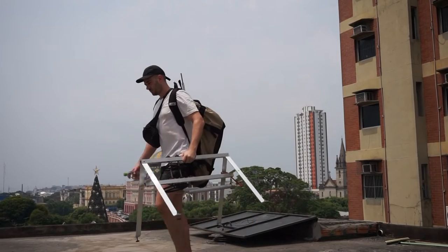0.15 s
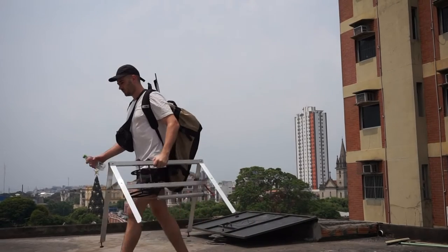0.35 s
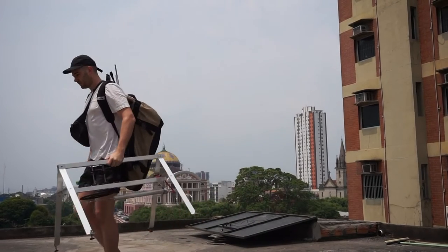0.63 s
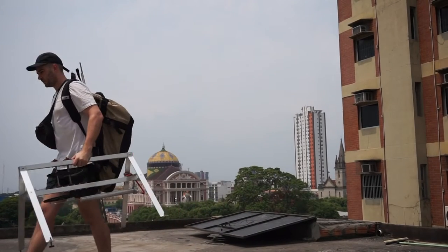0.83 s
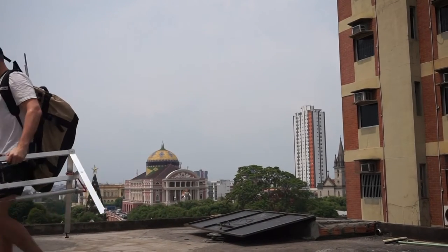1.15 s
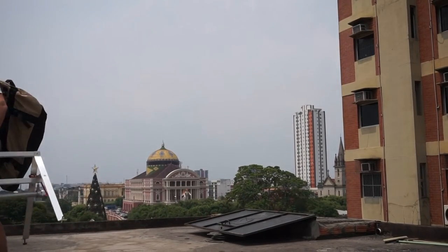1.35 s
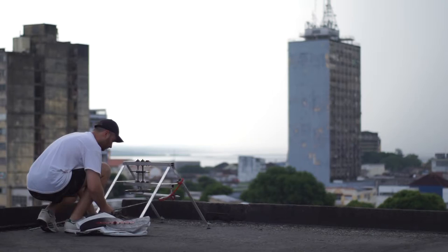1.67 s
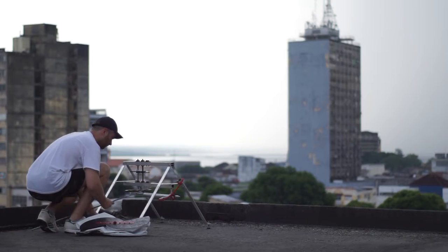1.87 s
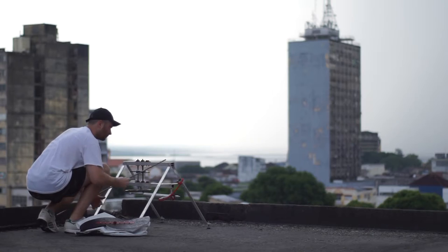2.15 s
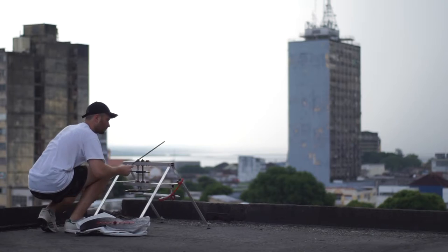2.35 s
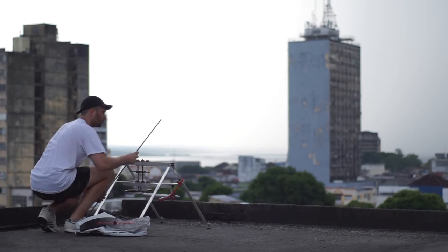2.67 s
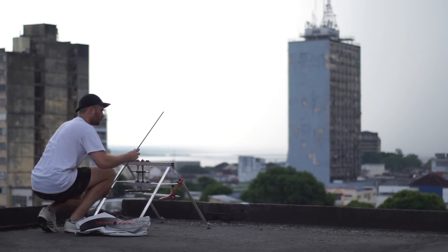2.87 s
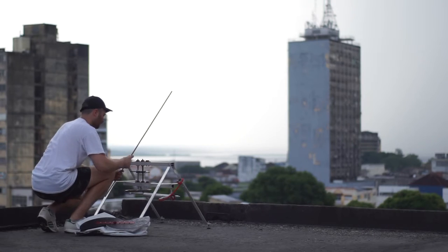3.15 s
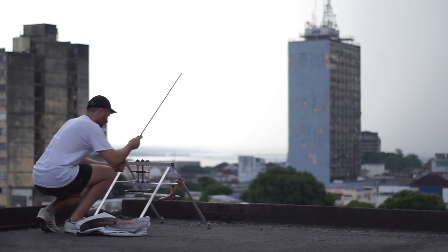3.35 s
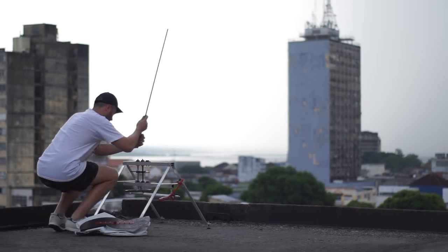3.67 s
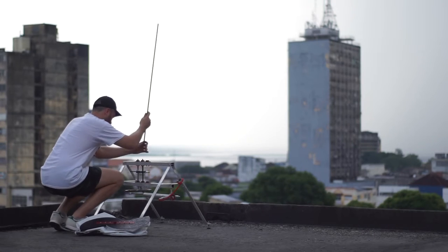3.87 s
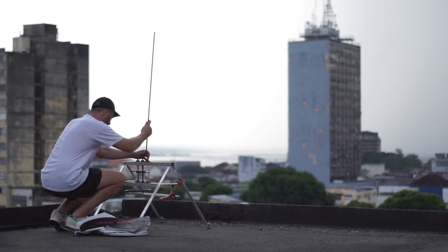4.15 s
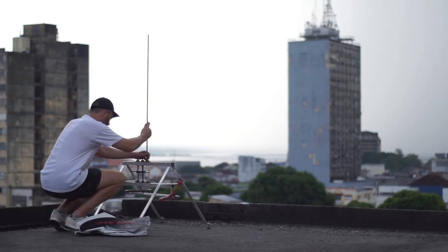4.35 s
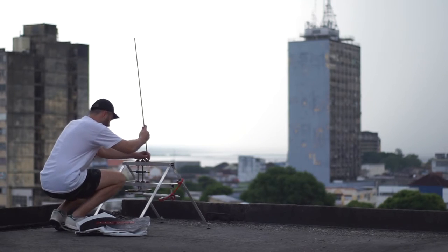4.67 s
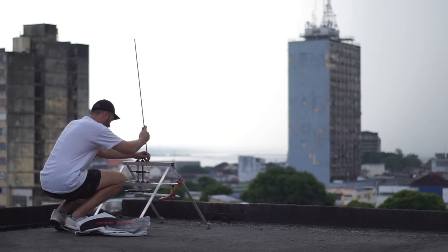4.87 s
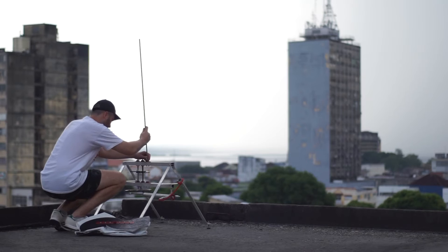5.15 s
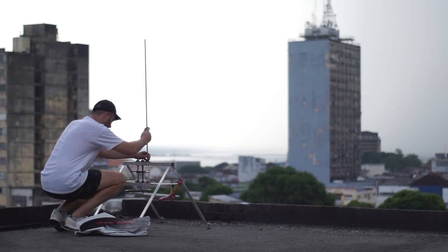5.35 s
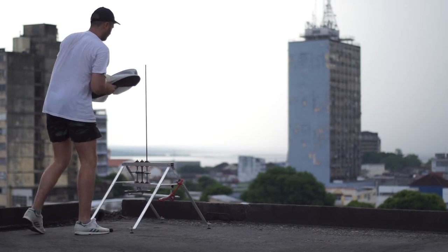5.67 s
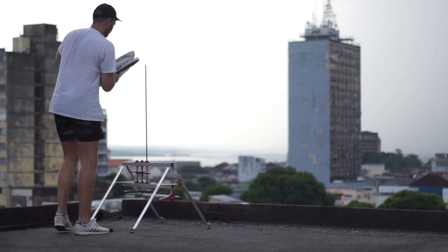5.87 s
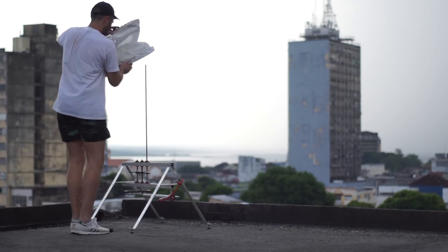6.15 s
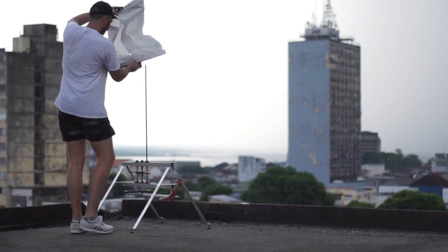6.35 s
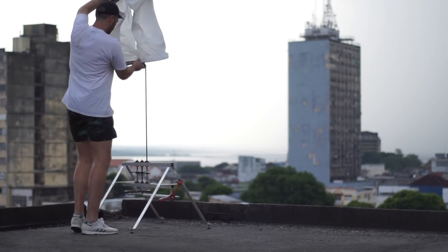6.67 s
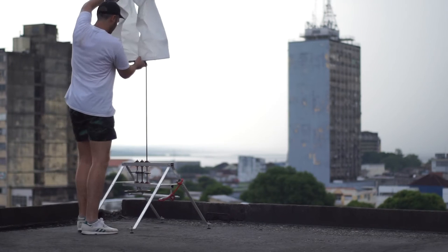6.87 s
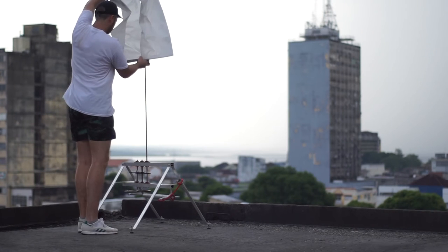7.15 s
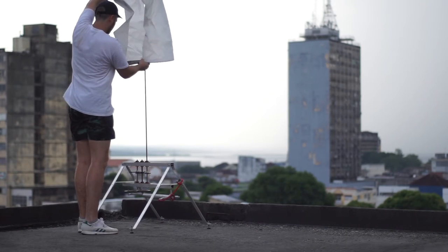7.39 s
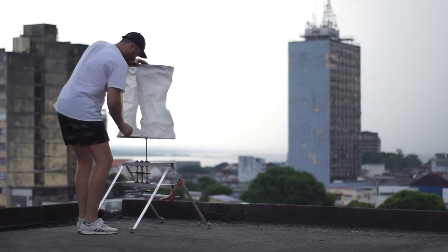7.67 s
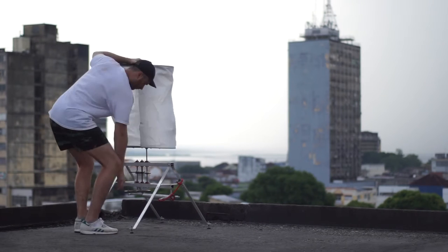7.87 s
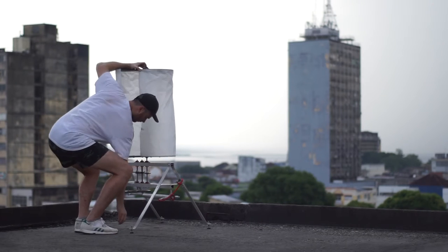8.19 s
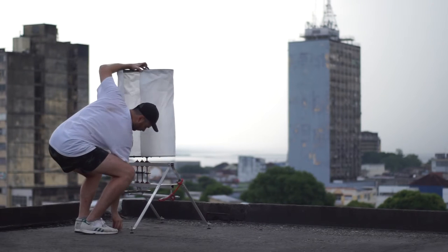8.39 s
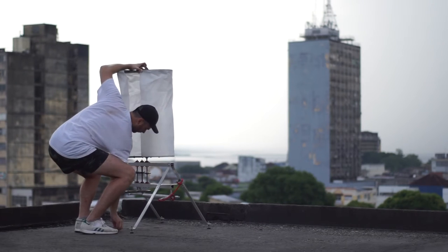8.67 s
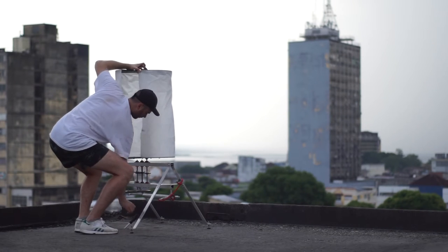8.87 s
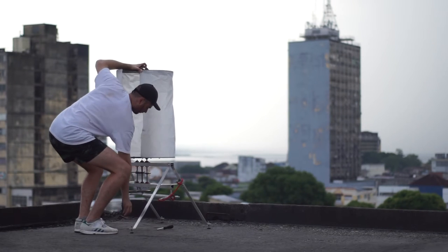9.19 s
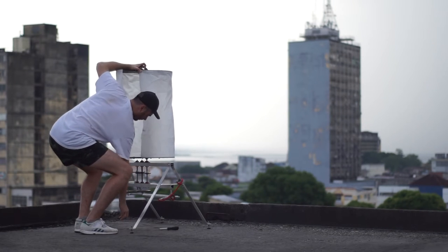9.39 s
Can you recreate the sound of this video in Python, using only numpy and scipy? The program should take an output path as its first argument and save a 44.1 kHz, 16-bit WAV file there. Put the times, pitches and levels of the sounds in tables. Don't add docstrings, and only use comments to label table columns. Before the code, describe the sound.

Two spaced microphones over an open roof catch bassy city traffic, calm at first and busiest at the end. Engines drone up and down, with a faint far horn near two seconds. Close, sparse handling sounds interrupt: dry shoe taps and hollow tube knocks, then a click with a tiny rod squeak, then two short bright jingles of metal parts with rustling cloth.

```python
import sys
import numpy as np
from scipy import signal
from scipy.io import wavfile

SR = 44100
rng = np.random.default_rng(int(sys.argv[2]) if len(sys.argv) > 2 else 0)


def amplitude_ratio(level_db):
    exponent = np.asarray(level_db, float) / 20
    return 10 ** exponent


def digitize_waveform(pressure):
    field = np.atleast_2d(pressure).T
    bounded = np.clip(field, -1, 1)
    quanta = np.round(bounded * 32767).astype(np.int16)
    wavfile.write(sys.argv[1], SR, quanta)


N = 420273
SPACING_S = 35 / SR


def rms_one(x):
    return x / np.sqrt(np.mean(x ** 2) + 1e-20)


def in_time(rows):
    s, *columns = np.transpose(rows)
    return [np.interp(np.arange(N) / SR, s, c) for c in columns]


def at_hz(points, hz):
    table_hz, value = np.transpose(points)
    return np.interp(np.log(hz), np.log(table_hz), value)


def drift(rate):
    r = np.exp(-80 * np.pi * rate / SR)
    slow = signal.lfilter([1], [1, -2 * r, r * r], rng.standard_normal(N // 40 + 2002))[2000:]
    return rms_one(slow - slow.mean())


def spread(slow):
    return np.interp(np.arange(N) / 40, np.arange(len(slow)), slow)


def bumps(rows):
    t = np.arange(N // 40 + 2) * 40 / SR
    return spread(sum(db * np.exp(-((t - s) / half_s) ** 2) for s, half_s, db in rows))


def band_pass(x, low_hz, high_hz):
    return signal.sosfilt(signal.butter(2, [low_hz, high_hz], "band", fs=SR, output="sos"), x)


def ring(clicks, hz, t60):
    r, w = amplitude_ratio(-60 / (t60 * SR)), 2 * np.pi * hz / SR
    return signal.lfilter([0, np.sin(w)], [1, -2 * r * np.cos(w), r * r], clicks + 1e-18)


def lean(left_db):
    return amplitude_ratio(np.array([[left_db], [-left_db]]))


def heard(x, lag_s, pan_db):
    n, half = np.arange(N), lag_s * SR / 2
    return np.array([np.interp(n - half, n, x), np.interp(n + half, n, x)]) * lean(pan_db / 2)


# (frequency [Hz], share [0-1])
STRAIGHT_SHARE = [(25, 0.93), (60, 0.94), (130, 0.79), (300, 0.69), (640, 0.32), (1300, 0.25), (3000, 0),
                  (8000, 0.17)]


def street_noise(spectrum, right_share, patchy_db, scatter=1.0):
    lag, pad, out = round(SPACING_S * SR), SR // 2, 0
    draws = rng.standard_normal((2, 4, N + pad))
    right = draws[:, 0] * np.sqrt(right_share)
    left = draws[:, 1] * np.sqrt(1 - right_share)
    straight = np.stack([np.roll(right, lag, axis=1) + left, right + np.roll(left, lag, axis=1)], axis=1)
    first_hz, last_hz = spectrum[0][0], spectrum[-1][0]
    edges = first_hz * 2 ** np.arange(0, np.log2(last_hz / first_hz) + 1 / 3, 1 / 3)
    together = drift(4.2)
    for k, (low, high) in enumerate(zip(edges, np.minimum(edges[1:], .45 * SR))):
        hz = np.sqrt(low * high)
        share = np.clip(at_hz(STRAIGHT_SHARE, hz) ** scatter, 0, 1)
        white = np.sqrt(share) * straight[k % 2] + np.sqrt(1 - share) * draws[k % 2, 2:]
        level_db = at_hz(spectrum, hz) + patchy_db * (1.06 * together + drift(6.2))
        out = out + spread(amplitude_ratio(level_db)) * band_pass(white, low, high)[:, pad:]
    return rms_one(out)


# (nearest at [s], tyres [dB], time to fall 3 dB [s], in view from [s], in view to [s])
PASSING_VEHICLES = [
    (5.33, -45, .5, 4.45, 5.4),
    (8.77, -43.5, 0.36, 8.15, 9.9),
    (9.75, -46.5, 0, 9.0, 9.9),
    (4.57, -48.5, 0.2, 4.8, 5.4),
]


def nearness():
    empty_street_db, hidden_loss_db, corner_s = -56, 4, 0.087
    t, power, seen = np.arange(N) / SR, amplitude_ratio(2 * empty_street_db), 0
    for s, db, width_s, from_s, to_s in PASSING_VEHICLES:
        view = np.clip(np.minimum(t - from_s, to_s - t) / corner_s + .5, 0, 1)
        nearest = amplitude_ratio(2 * (db - hidden_loss_db * (1 - view)))
        power = power + nearest / (1 + ((t - s) / width_s) ** 2)
        seen = seen + view
    return 10 * np.log10(power), np.minimum(seen, 1)


# (frequency [Hz], level [dB per Hz])
TYRE_COLOUR = [(550, -8), (850, -4), (1270, 1.5), (1750, 0.5), (2200, 0), (3000, -13), (3900, -7.5),
               (5200, -16.5), (6200, -23.5), (8000, -46)]
# (frequency [Hz], width [Hz], level [dB])
TREAD_TONES = [
    (3850, 200, -36),
    (4900, 200, -39),
]


def passing():
    tyres_db, seen = nearness()
    loudest_db, in_view_s = PASSING_VEHICLES[1][1], PASSING_VEHICLES[1][3]
    above_db = tyres_db - loudest_db
    coasting = np.arange(N) < in_view_s * SR - SR
    gear_db = -48.5 + 0.87 * above_db - 2.5 * coasting
    brake_db = -71 + 1.4 * above_db - 10 * (1 - seen)
    tyres = street_noise(TYRE_COLOUR, right_share=1.0, patchy_db=.5, scatter=0.81)
    white = rng.standard_normal((2, N))
    for hz, width, level_db in TREAD_TONES:
        tread = rms_one(ring(white, hz, 1.6 / width))
        tyres = tyres + spread(amplitude_ratio(level_db + 3.4 * drift(2.3))) * tread
    gear = rms_one(ring(white, hz=2198, t60=.035))
    brake = rms_one(ring(white, hz=7000, t60=.03))
    return (amplitude_ratio(tyres_db) * tyres + amplitude_ratio(gear_db) * gear + amplitude_ratio(brake_db) * brake) * lean(-1.2)


def engine(rows, wobble):
    hz, *levels_db = in_time(rows)
    t = np.arange(N) / SR
    first_s, last_s = rows[0][0], rows[-1][0]
    always_on = first_s == 0
    fade = np.clip(np.minimum(t - first_s + always_on, last_s - t + always_on) / .15, 0, 1)
    phase = 2 * np.pi * np.cumsum(hz * (1 + wobble * spread(drift(5.1)))) / SR
    out, on = np.zeros(N), fade > 0
    orders = sum(amplitude_ratio(db[on]) * np.sin((k + 1) * phase[on]) for k, db in enumerate(levels_db))
    out[on] = np.sqrt(2) * fade[on] * orders
    return out


# (time [s], firing rate [Hz], level [dB])
TRUCK_REVS = [
    (.25, 48.22, -47),
    (0.501, 59.6, -26),
    (.85, 73.8, -22.5),
    (1.25, 82.14, -30.5),
    (1.402, 78.34, -26),
    (2.001, 90.3, -25.5),
    (2.96, 94.74, -28),
    (3.62, 91.2, -31.5),
    (4.2, 88.8, -39),
]
# (time [s], half length [s], level [dB])
TRUCK_SHADES = [(.67, .08, -16), (1.05, .1, -8), (1.3, .05, -10), (1.72, .06, -6), (2.6, .08, -14),
                (2.97, .05, -12), (3.45, .06, -14), (3.8, .08, -12), (4.07, .06, -12)]


def truck():
    octave = [(s, 2 * hz, db - 14 - .4 * (hz - 70)) for s, hz, db in TRUCK_REVS]
    shade_db = bumps(TRUCK_SHADES)
    flutter, octave_flutter = spread(drift(5.0)), spread(drift(3.0))
    tone = amplitude_ratio(shade_db + 2.0 * flutter) * engine(TRUCK_REVS, wobble=0.014)
    return tone + amplitude_ratio(.6 * shade_db + 1.5 * octave_flutter) * engine(octave, wobble=0.0195)


# (time [s], firing rate [Hz], level [dB])
BUS_REVS = [(0, 28.93, -37), (.65, 28.62, -31), (1.5, 28, -35), (2.9, 27.5, -30), (3.6, 26.22, -30),
            (4.4, 26.33, -23), (5.25, 27.92, -29.5), (5.55, 29.77, -24), (6.2, 30.3, -27),
            (6.4, 29.94, -32), (7.45, 28.61, -34), (7.9, 28.29, -33.5), (9.53, 28.16, -31)]


def bus():
    return spread(amplitude_ratio(2.0 * drift(2.2))) * engine(BUS_REVS, wobble=0.013)


# (time [s], firing rate [Hz], level [dB], level of its octave [dB])
VAN_REVS = [
    (6.9, 54.1, -12, -51),
    (6.996, 57.6, -25, -37),
    (7.106, 59, -31, -50),
    (7.5, 58.6, -25, -46),
    (8.018, 57.96, -31, -48),
    (8.076, 57.76, -44, -42),
    (8.2, 60.9, -40, -47),
]


def van():
    return engine(VAN_REVS, wobble=0.0076)


# (time [s], firing rate [Hz], level [dB])
MOTORBIKE_REVS = [
    (3.5, 105, -52),
    (3.9, 120, -46),
    (4.4, 140, -47.5),
    (4.784, 160, -43),
    (5.2, 166.1, -41),
    (5.43, 175.7, -43),
    (5.552, 170.3, -50),
    (5.64, 179.6, -40),
    (6.0, 194.9, -48.5),
]


def motorbike():
    return amplitude_ratio(2.0 * spread(drift(5.8)) + 0.5) * engine(MOTORBIKE_REVS, wobble=0.011)


# (time [s], firing rate [Hz], level [dB])
CAR_REVS = [
    [(6.5, 158.9, -43), (7.0, 156.4, -45), (7.6, 149.6, -42.5), (8.1, 154, -64)],
    [(7.3, 170.8, -53), (7.7, 169, -43.5), (8.2, 167.9, -49)],
]


def cars():
    return sum(spread(amplitude_ratio(2.86 * drift(3.6) - 2.0)) * engine(car, wobble=.013) for car in CAR_REVS)


# (time [s], firing rate [Hz], level [dB])
QUEUE_REVS = [
    [(3.5, 41.56, -41), (4.1, 42.5, -30.5), (4.5, 43.53, -32), (5.3, 43.8, -39)],
    [(5.2, 38.3, -38), (5.6, 38.16, -28), (6.2, 40.03, -29.5), (7.4, 38.45, -33.5), (8.3, 37.63, -34),
     (9.1, 41.53, -33), (9.7, 40.74, -32)],
    [(2.6, 52.13, -34), (3.4, 53.04, -35), (4.4, 53.12, -29), (5.0, 55, -37)],
    [(1.4, 64.43, -35), (2.0, 64.17, -31), (3.1, 63.5, -36.5), (3.5, 65.8, -30)],
    [(4.9, 49.6, -38), (5.5, 49.84, -30), (6.4, 46.97, -33), (6.9, 46.9, -34)],
    [(8.2, 56.97, -30.5), (8.75, 54.65, -32), (9.3, 56.3, -28.5), (9.7, 57.04, -31)],
    [(4.9, 120, -53), (5.35, 122.3, -41), (5.8, 120.6, -62)],
    [(8.5, 118.9, -46), (9.15, 122, -45.5), (9.7, 121.9, -48)],
    [(8.7, 80.1, -45), (9.2, 80.1, -37.5), (9.7, 77.2, -41.5)],
    [(4.5, 78, -44), (4.95, 76.1, -34.5), (5.6, 84.1, -38), (6.0, 84.3, -39)],
]


def queue():
    return sum(spread(amplitude_ratio(1.5 * drift(3.0))) * engine(rows, wobble=.025) for rows in QUEUE_REVS)


# (time [s], pitch [Hz], level [dB])
HORN_CALL = [
    (2.0, 545, -68),
    (2.25, 562, -56.5),
    (2.6, 559, -63.5),
    (2.9, 570, -58),
]


def horn():
    return engine(HORN_CALL, wobble=0.0043)


def struck(modes, times, level_db, chatter, count, contact_s):
    start = round((times.min() - .01) * SR)
    out = np.zeros((2, N))
    for (hz, mode_db, t60), hit_db in zip(modes, level_db):
        clicks, luck = np.zeros((2, N - start)), rng.standard_normal((len(times), count, 4))
        at, size = (times * SR).astype(int) - start, amplitude_ratio(hit_db + mode_db)
        later = at[:, None] + (.008 * SR * np.abs(luck[:, 1:, 0])).astype(int)
        for side in (0, 1):
            np.add.at(clicks[side], at, size * np.sign(luck[:, 0, 0]))
            bounce = luck[:, 1:, 1] + 2.0 * luck[:, 1:, 2 + side]
            np.add.at(clicks[side], later, chatter * size[:, None] * bounce)
        push = 2 * (1 - amplitude_ratio(-60 / (contact_s * SR))) * ring(clicks, hz, contact_s)
        out[:, start:] += ring(push, hz, t60)
    return out


# (frequency [Hz], level [dB], t60 [s])
PART_MODES = [(2848, 1, .05), (3429, 3.5, 0.036), (4075, 6, .04), (4770, 4, 0.055), (5490, 5, 0.046),
              (6255, 0, .03), (7120, -3, 0.053), (7590, -4, 0.12), (7950, -3.5, 0.054), (8872, -5, .055),
              (9760, -3, 0.047), (10670, -5.5, 0.048), (10950, -7, 0.054), (11660, -1, 0.042),
              (12730, -0.5, .06), (13740, 0, .06), (14730, 1, .06)]
# (time [s], level [dB], mode [Hz], mode [Hz], mode [Hz])
FIRST_JINGLE = [(7.106, -46, 10670, 11660, 12730), (7.107, -30.5, 4770, 4770, 4770),
                (7.1075, -32, 3429, 3429, 3429), (7.108, -38, 7950, 7950, 7950),
                (7.112, -38, 9760, 4075, 4075), (7.113, -47, 12730, 13740, 7120),
                (7.119, -48, 5490, 12730, 9760), (7.125, -46, 3429, 10950, 11660),
                (7.132, -47, 2848, 4075, 10670), (7.137, -44, 2848, 3429, 3429),
                (7.138, -44, 8872, 13740, 14730), (7.1447, -28, 11660, 10670, 10670),
                (7.1455, -41, 14730, 14730, 8872), (7.149, -44, 12730, 7590, 9760),
                (7.154, -38, 3429, 10670, 10670), (7.156, -49, 7120, 7950, 7590),
                (7.159, -34.5, 4075, 4075, 7950), (7.162, -42, 10670, 3429, 2848),
                (7.167, -41, 2848, 2848, 2848), (7.168, -49, 7950, 4770, 13740),
                (7.174, -43, 2848, 3429, 7950), (7.179, -51, 10670, 11660, 8872),
                (7.181, -44, 4075, 2848, 2848), (7.197, -50, 10670, 11660, 12730),
                (7.209, -52, 11660, 12730, 7950), (7.255, -47, 12730, 8872, 8872),
                (7.263, -56, 12730, 12730, 8872), (7.31, -61, 9760, 9760, 9760)]
# (time [s], level [dB], mode [Hz], mode [Hz], mode [Hz])
SECOND_JINGLE = [(9.397, -47, 4075, 3429, 3429), (9.403, -45.5, 3429, 4770, 4770),
                 (9.4035, -52, 13740, 6255, 11660), (9.407, -34, 4075, 4075, 4075),
                 (9.41, -51, 7120, 9760, 11660), (9.412, -40, 3429, 3429, 3429),
                 (9.427, -50, 11660, 12730, 13740), (9.428, -47, 4075, 5490, 10670),
                 (9.433, -44, 4075, 4075, 4075), (9.434, -50, 12730, 13740, 11660),
                 (9.439, -48, 7950, 7590, 13740), (9.445, -39, 3429, 4075, 11660),
                 (9.4465, -43, 7950, 10670, 13740), (9.447, -40, 6255, 4770, 9760),
                 (9.451, -39, 4075, 7950, 7950), (9.453, -43, 9760, 6255, 4770),
                 (9.453, -46, 12730, 13740, 10670), (9.457, -43, 3429, 4770, 13740),
                 (9.457, -49, 7950, 9760, 11660), (9.46, -49, 12730, 10670, 10670),
                 (9.463, -50, 4770, 3429, 7950), (9.476, -60, 12730, 11660, 10670)]


def jingle():
    s, knock_db, *favoured_hz = np.transpose(FIRST_JINGLE + SECOND_JINGLE)
    other_db = -17 - 0.44 * (knock_db + 34)
    levels_db = []
    for hz, _, _ in PART_MODES:
        share = np.exp(-(np.log(hz / np.array(favoured_hz)) / .03) ** 2).max(axis=0)
        levels_db.append(knock_db + other_db * (1 - share))
    parts = struck(PART_MODES, s, levels_db, chatter=.07, count=4, contact_s=.002)
    late = np.roll(parts[0], 4)
    parts[0] = signal.lfilter([1 - .35], [1, -.35], late)
    return parts * lean(-1.5)


# (frequency [Hz], level [dB], t60 [s])
PIN_MODES = [(7500, -20, .15), (7960, -17, .15), (10950, -1, .14), (11430, -10, .08), (15060, -2, .055),
             (15550, -9, .045)]
# (time [s], peak [dB], extra level of its top modes [dB])
PIN_KNOCKS = [(9.308, -66, -8), (9.324, -45, -2), (9.33, -44, 1), (9.349, -45, -1), (9.356, -46, -10),
              (9.366, -54, 7), (9.378, -45, -8), (9.389, -50, 5), (9.402, -47, -20), (9.425, -50, -15),
              (9.437, -49, -15), (9.445, -49, -6), (9.455, -54, 0)]


def pin():
    s, peak_db, top_db = np.transpose(PIN_KNOCKS)
    top = np.array(PIN_MODES)[:, 0] > 13000
    levels_db = [peak_db + top_db * high for high in top]
    return struck(PIN_MODES, s, levels_db, chatter=.06, count=3, contact_s=.006) * lean(-.8)


def taps(rows, octaves):
    out, t = np.zeros((2, N)), np.arange(600) / SR
    half_band = 2 ** (octaves / 2)
    for s, db, hz, pan_db in rows:
        i = round(s * SR)
        snap = rng.standard_normal(len(t)) * np.exp(-t * (400 + hz / 8.2))
        snap[0] = 7
        tap = band_pass(snap, hz / half_band, min(hz * half_band, 13000))
        out[:, i:i + len(t)] += amplitude_ratio(db) * tap / np.abs(tap).max() * lean(pan_db / 2)
    return out


# (time [s], peak [dB], centre [Hz], left over right [dB])
SHOE_TICKS = [(.570, -45, 7014, -5), (.655, -49, 5080, 1), (0.971, -37, 4000, 5), (0.9713, -44, 10500, 3),
              (1.08, -29.5, 2880, 1), (1.0802, -38, 5540, 4), (1.087, -43, 6500, -2),
              (1.175, -41, 3500, -8), (1.182, -45, 7000, -3), (1.678, -47, 5500, 4), (1.747, -50, 3520, 4),
              (1.7874, -28, 904, 0), (1.795, -41, 5200, 0), (1.8225, -47, 5516, -1),
              (3.5805, -30, 3700, 11), (3.58, -30, 2400, 6), (3.59, -40, 4500, 4), (7.052, -46, 8785, 8.5),
              (9.262, -41, 8900, 6)]


def ticks():
    return taps(SHOE_TICKS, octaves=1.14)


# (time [s], peak [dB], centre [Hz], left over right [dB])
FRAME_KNOCKS = [(1.083, -41, 900, 0), (1.174, -36, 1210, -1), (1.181, -35, 1100, -1),
                (1.1812, -38, 1700, -1), (1.794, -34, 750, 0), (1.7935, -33, 2850, -.5),
                (1.7875, -35, 1400, 0), (3.634, -37, 2590, 1), (3.65, -35, 2666, 1)]


def knocks():
    return taps(FRAME_KNOCKS, octaves=.55)


def burst(at_s, length_s, rise_s):
    t = np.arange(round(length_s * SR)) / SR
    i = round(at_s * SR)
    return slice(i, i + len(t)), np.clip(np.minimum(t, length_s - t) / rise_s, 0, 1)


# (time [s], length [s], level [dB], low edge [Hz], high edge [Hz])
CLOTH_RUSTLES = [(0.455, 0.033, -62.5, 3500, 8150), (0.508, .035, -65, 4000, 11700),
                 (1.07, 0.084, -67, 4020, 13600), (1.677, 0.028, -67, 3500, 8800),
                 (3.567, .013, -60, 3000, 10000), (3.578, .021, -56, 6000, 13500),
                 (3.58, .017, -48, 2000, 5000), (3.631, .024, -52, 2000, 4500),
                 (3.631, .024, -62, 5000, 13500), (3.39, 0.079, -72, 4984, 11800),
                 (7.102, .03, -49, 2200, 14000), (7.13, 0.062, -66, 7500, 15000),
                 (7.153, 0.045, -54, 2000, 5500), (7.132, 0.05, -46, 1200, 2800),
                 (7.207, 0.091, -62, 5000, 13500), (9.318, .012, -56, 8500, 12000),
                 (9.316, .09, -72, 14600, 15600), (9.395, 0.085, -69, 7000, 14000),
                 (9.44, .025, -60, 14500, 15750)]


def rustles():
    out = np.zeros((2, N))
    for s, length, db, low_hz, high_hz in CLOTH_RUSTLES:
        span, shape = burst(s, length, 0.0031)
        grains = rng.standard_normal((3, len(shape))) * rng.exponential(1, len(shape))
        hiss = band_pass(grains[0] + 0.76 * grains[1:], low_hz, high_hz)
        out[:, span] += amplitude_ratio(db) * shape * rms_one(hiss)
    return out


# (time [s], length [s], pitch [Hz], level [dB])
ROD_SQUEAKS = [(3.52, .026, 5900, -61), (3.546, .014, 5880, -55), (3.563, .012, 5880, -50),
               (3.573, 0.013, 5880, -48), (3.59, .018, 5840, -56), (0.749, .15, 11700, -72),
               (1.275, 0.12, 4670, -64.5), (2.753, 0.29, 4630, -68), (5.88, 0.03, 9670, -66),
               (5.88, 0.032, 12820, -67), (8.44, 0.046, 14660, -67)]


def squeaks():
    out = np.zeros((2, N))
    for s, length, hz, db in ROD_SQUEAKS:
        span, shape = burst(s, length, length / 3)
        rubbing = rng.standard_normal((2, len(shape) + 2000))
        out[:, span] += amplitude_ratio(db) * shape * rms_one(ring(rubbing, hz, 0.036)[:, 2000:])
    return out


# (frequency [Hz], level [dB per Hz])
RUMBLE_COLOUR = [(18, -14), (26, -14), (45, 4), (70, -1.5), (95, -12), (125, -18.5)]
# (time [s], half length [s], level [dB])
RUMBLE_SURGES = [(.45, 0.083, 3), (1.6, 0.21, -0.5), (3.5, 0.13, 3), (4.1, 0.27, 3.5), (4.99, 0.13, 3.5),
                 (5.41, 0.11, 5.5), (6.45, 0.48, 2), (7.5, 0.12, 2.5), (8.15, 0.063, -8), (8.3, 0.17, 0),
                 (8.95, 0.13, 0.5), (9.24, 0.082, 4), (9.5, 0.11, -3)]
# (frequency [Hz], level [dB per Hz])
DRONE_COLOUR = [(75, -17.5), (110, -2.5), (170, -5), (280, -7), (400, -16), (560, -28.5)]
# (frequency [Hz], level [dB per Hz])
ROAR_COLOUR = [(330, -6.5), (480, -3.5), (700, -4.5), (1100, -4), (1600, -10), (2300, -15), (3000, -20.5),
               (4600, -26), (5700, -39.5), (8000, -37.5), (12500, -43.5)]
# (time [s], level [dB])
BUSY_STREETS = [
    (0, -2),
    (1.2, -2.5),
    (2.7, -1.5),
    (3.7, -0.5),
    (4.9, 3),
    (5.6, 1.5),
    (6.2, 1),
    (7.8, 0),
    (8.9, 2.5),
    (9.53, 4.5),
]


def streets():
    busy_db, = in_time(BUSY_STREETS)
    rumble = street_noise(RUMBLE_COLOUR, right_share=0.32, patchy_db=0.4)
    drone = street_noise(DRONE_COLOUR, right_share=0.61, patchy_db=0.1)
    roar = street_noise(ROAR_COLOUR, right_share=0.31, patchy_db=.5)
    out = amplitude_ratio(-29.5 + bumps(RUMBLE_SURGES)) * rumble
    out = out + amplitude_ratio(-41.5 + 1.26 * busy_db) * drone
    return out + amplitude_ratio(-44 + 0.77 * busy_db) * roar


def scene():
    ahead = heard(truck() + bus() + horn(), 0, 0.98)
    right = heard(van() + motorbike() + cars(), SPACING_S, .5)
    traffic = passing() + ahead + right + heard(queue(), 0, 1.2)
    roof = jingle() + pin() + ticks() + knocks() + rustles() + squeaks()
    return traffic + roof + streets()


def band_limit(x):
    return signal.sosfilt(signal.butter(12, 15800, fs=SR, output="sos"), x)


def record(dry):
    hiss_colour = signal.butter(16, 13300, fs=SR, output="sos")
    hiss = signal.sosfilt(hiss_colour, rng.standard_normal(dry.shape))
    top_cut = signal.cheby2(12, 50, 16000, fs=SR, output="sos")
    mix = signal.sosfilt(top_cut, dry) + amplitude_ratio(-67) * hiss
    return band_limit(mix)


dry = scene()
out = record(dry)
digitize_waveform(out)
```